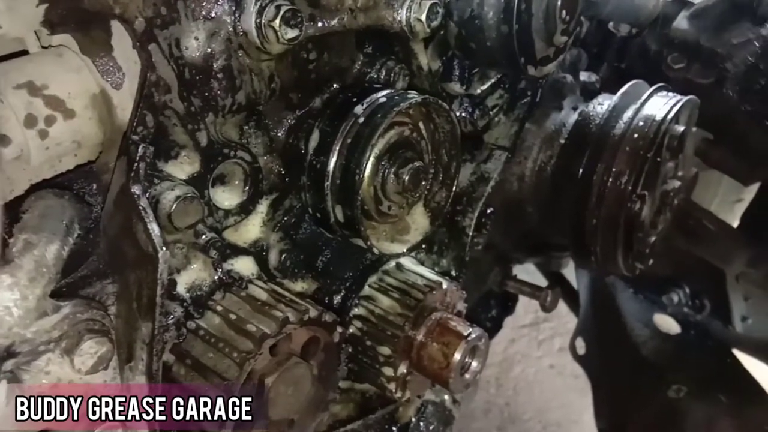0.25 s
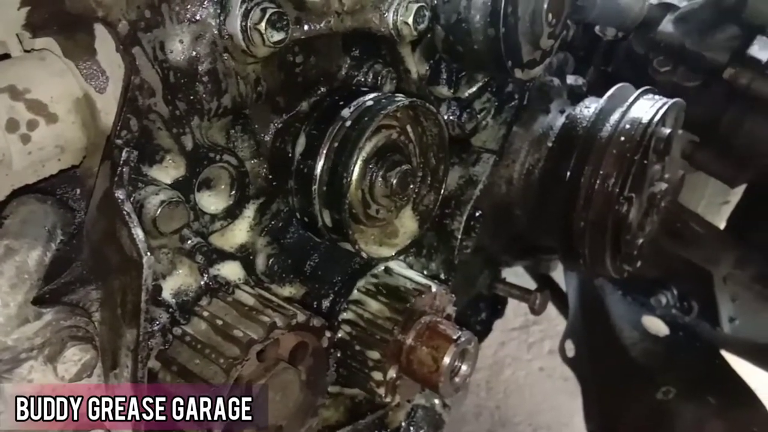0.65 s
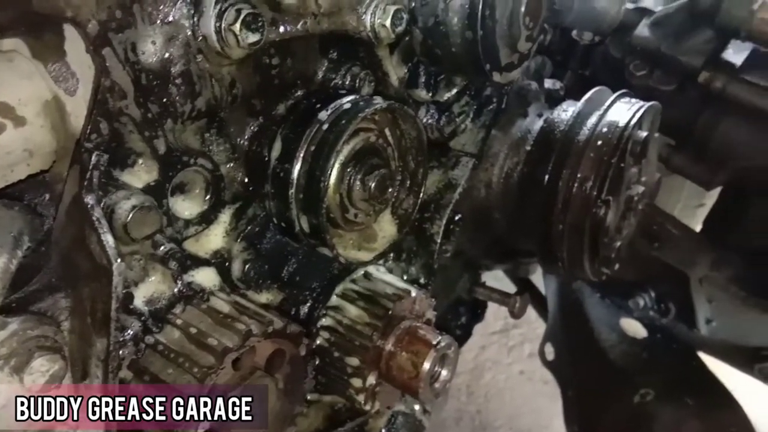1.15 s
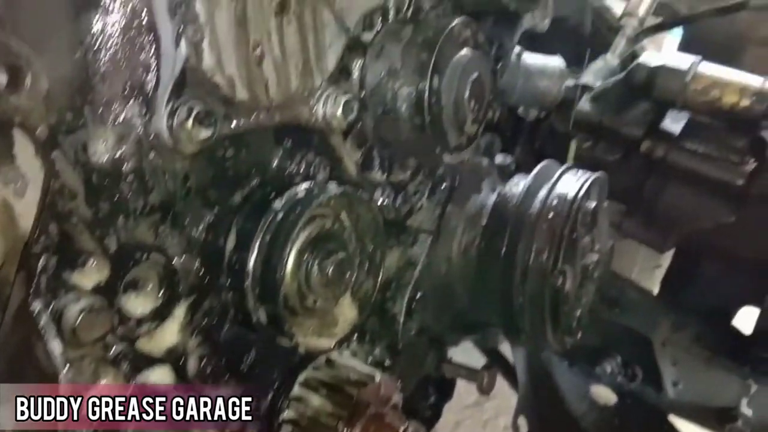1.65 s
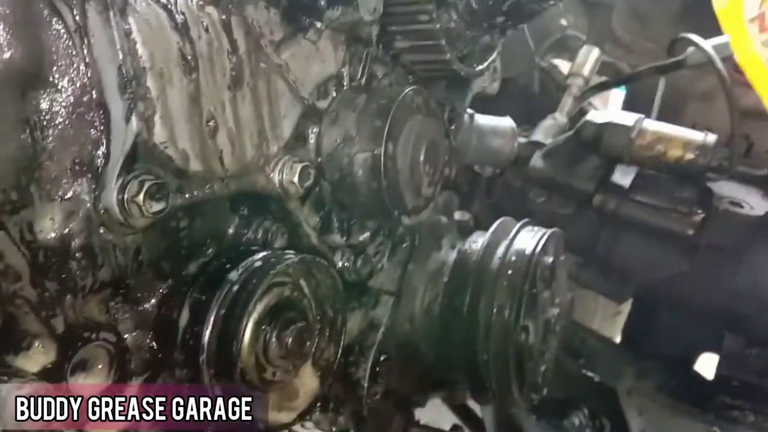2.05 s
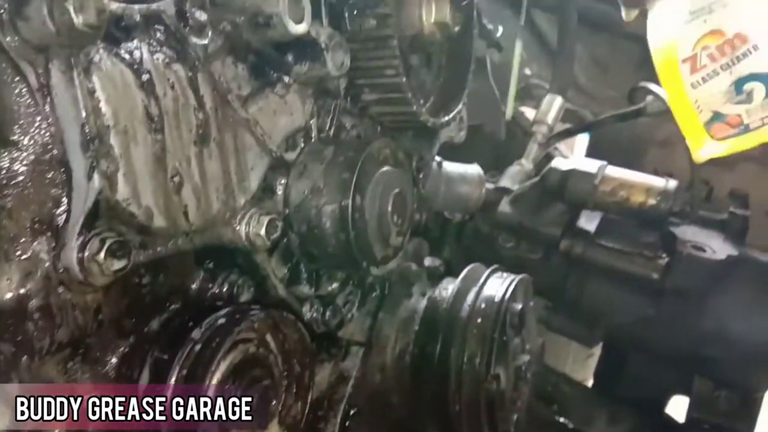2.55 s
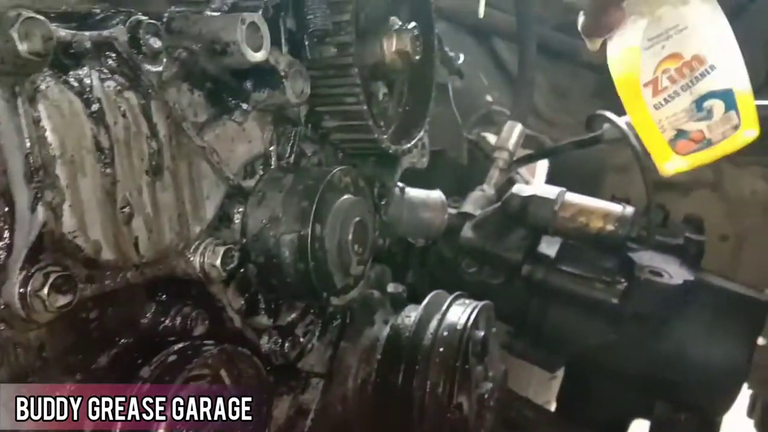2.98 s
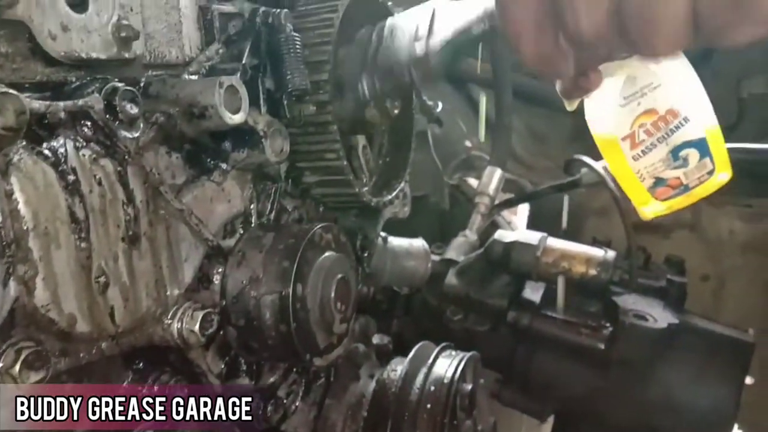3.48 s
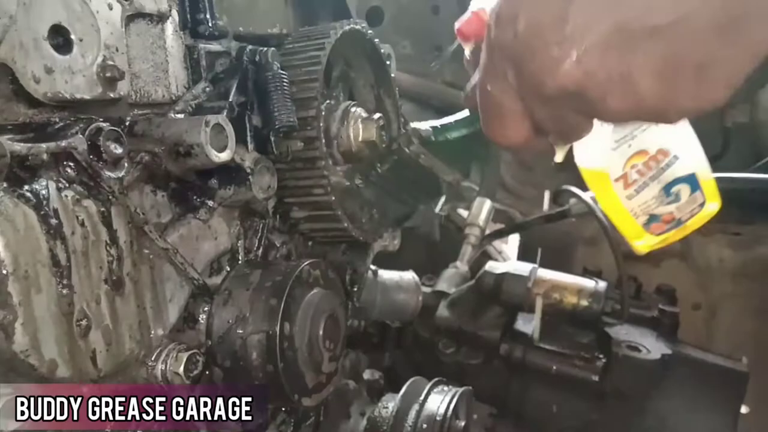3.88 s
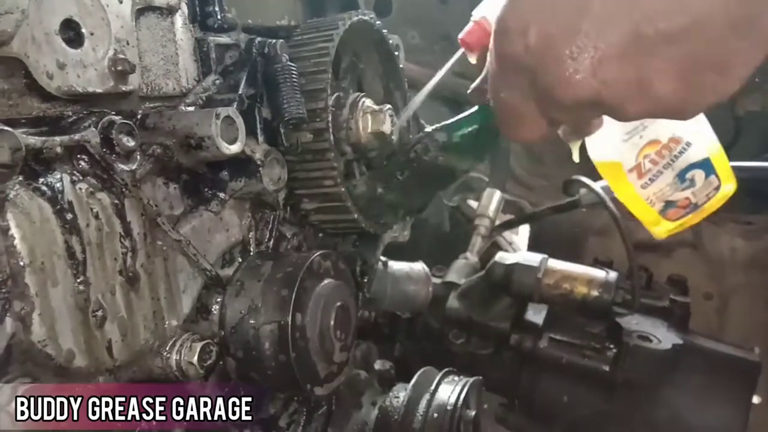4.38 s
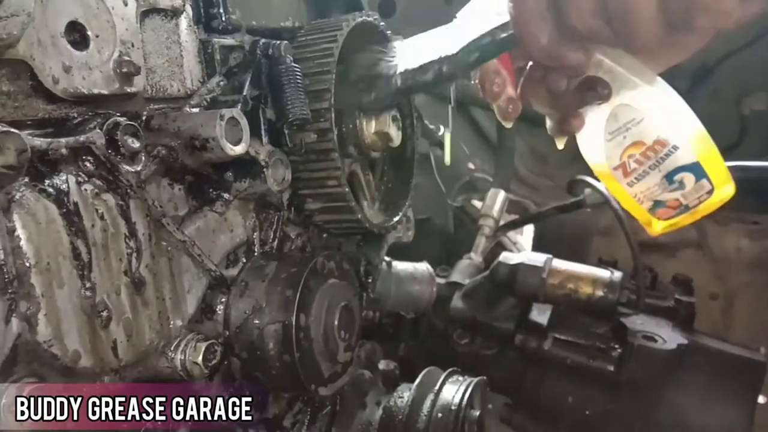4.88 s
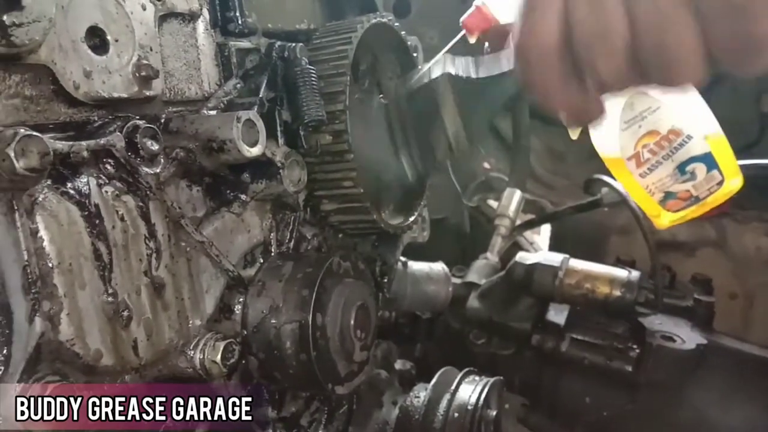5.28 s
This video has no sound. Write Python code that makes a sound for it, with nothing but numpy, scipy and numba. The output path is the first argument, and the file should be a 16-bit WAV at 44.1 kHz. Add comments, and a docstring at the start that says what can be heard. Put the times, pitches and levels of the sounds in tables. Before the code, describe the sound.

Close up in a small garage, a plastic trigger bottle clicks and squirts bright, short jets. The first two drum dully on a hollow cover; later ones splash on wet metal. Scrubbing starts faint, then becomes louder and nearly continuous after about a second, in quick scratchy strokes with little wet spits. A low machine throb wavers behind, and a faint whistle falls once midway. Near-mono phone-like microphone with a short room.

```python
"""In a garage, a trigger bottle squirts cleaner on a greasy engine part that is rubbed in short strokes.
Jets and strokes are flickering grains of noise through resonant bands; each jet bursts out and brightens.
Noise-driven modes give the trigger's snaps, wet spits and the drumming of the first jets on a hollow cover.
Behind, a slow machine throbs as a sum of orders, dull bands of noise swell and a faint whistle falls once."""
import sys
import numpy as np
from scipy import signal
from scipy.fft import rfft, irfft
from scipy.io import wavfile
from scipy.ndimage import uniform_filter1d
from numba import njit

SR = 44100
rng = np.random.default_rng(int(sys.argv[2]) if len(sys.argv) > 2 else 0)


def dump_mix(stems):
    """Bounce the given channels to the path in sys.argv[1] as a 16-bit WAV at rate SR."""
    frames = np.atleast_2d(stems).T  # one column per channel
    limited = np.clip(frames, -1, 1)  # hard clip at full scale
    pcm = np.round(limited * 32767).astype(np.int16)
    wavfile.write(sys.argv[1], SR, pcm)


N = 243873
T = np.arange(N) / SR  # s


def undb(db):
    """Level definition: amplitude ratio of a level in dB."""
    return 10 ** (np.asarray(db) / 20)


def unit(x):
    """Normalisation to an effective (RMS) value of 1."""
    return x / np.sqrt(np.mean(x ** 2))


def peak(x):
    """Normalisation to a peak of 1."""
    return x / np.abs(x).max()


def curves(rows):
    """Linear interpolation of every column after t/s over the scene."""
    s, *columns = np.transpose(rows)
    return [np.interp(T, s, column) for column in columns]


@njit
def svf(x, hz, width):
    """State-variable band-pass with a moving centre, gain 1 at the centre."""
    y, b, l = np.empty(len(x)), 0., 0.
    for i in range(len(x)):
        g, k = np.tan(np.pi * hz[i] / SR), width / hz[i]
        v = (b + g * (x[i] - l)) / (1 + g * (g + k))
        b, l, y[i] = 2 * v - b, l + 2 * g * v, k * v
    return y


def band(x, hz, width_hz):
    """Resonance: band-pass with a fixed or moving centre."""
    return svf(x, np.zeros(N) + hz, 1. * width_hz)


def cut(x, hz, kind, order=4):
    """Butterworth filtering: maximally flat passband."""
    return signal.sosfilt(signal.butter(order, hz, kind, fs=SR, output="sos"), x)


def colour(x, points):
    """Spectral shaping by (f/Hz, level/dB) points, linear in log f."""
    hz = np.fft.rfftfreq(N, 1 / SR) + 1
    f, db = np.array(points).T
    return irfft(rfft(x) * undb(np.interp(np.log(hz), np.log(f), db)), N)


def walk(rate):
    """Smoothed random modulation: values held 1 / rate s, slewed twice; spread near 1."""
    k = max(int(SR / rate), 1)
    steps = np.repeat(rng.standard_normal(N // k + 1), k)
    return 1.12 * uniform_filter1d(uniform_filter1d(steps, k), k)[:N]


def grains(scatter_db, flicker_db, rate):
    """Granular noise: dense one-sample contacts of uneven size under a flickering level."""
    sizes_db = scatter_db * np.minimum(rng.exponential(size=N), 5)
    return rng.standard_normal(N) * undb(sizes_db + flicker_db * walk(rate))


def ring(push, modes):
    """Modal superposition: a push convolved with decaying (f/Hz, level/dB, T60/s) sines."""
    t = np.arange(len(push)) / SR
    body = sum(undb(db) * np.sin(2 * np.pi * hz * t) * np.exp(-np.log(1000) * t / t60)
               for hz, db, t60 in modes)
    return signal.fftconvolve(push, body)[:len(push)]


def add(out, s, x):
    """Linear superposition of an event on the sum from time s."""
    i = int(s * SR)
    out[i:i + len(x)] += x[:N - i]


def jet(s, length):
    """Pressure-driven flow: the level/dB bursts out, builds, sags with the pressure and stops."""
    burst_s, build_s, build_db = 0.0032, 0.037, 4.5
    sag_db_s, stop_db_s = 120, 442
    t = T - s
    db = -build_db * np.clip(1 - t / build_s, 0, 1) - sag_db_s * np.maximum(t - build_s, 0)
    burst_db = 20 * np.log10(np.clip(t / burst_s, 1e-9, 1))
    return db + burst_db - stop_db_s * np.maximum(t - length, 0)


def stroke(s, swell, hold):
    """Speed-dependent friction: level/dB swells as the hand gains speed, holds, dies as it lifts."""
    swell_db, lift_db_s = 14.5, 414
    t = T - s - swell
    return swell_db * np.minimum(t, 0) / swell - lift_db_s * np.maximum(t - hold, 0)


# jets: t/s, mist level/dB, length/s, splash on the casting re mist level/dB, scrape re splash level/dB
JETS = [(0.282, -28, 0.092, -8.5, -8), (0.679, -26, 0.068, -8.5, -4.5), (1.134, -25.5, 0.15, -11, -7),
        (1.757, -28.5, 0.14, -4, -10.5), (2.156, -26, 0.14, -7.5, -13.5), (2.587, -25.5, 0.1, -5.5, -11.5),
        (2.948, -26, 0.083, -8.5, -7), (3.374, -26, .1, -5.5, -8), (3.868, -28, 0.15, -7, -11.5),
        (4.351, -24.5, 0.088, -9, -14), (5.16, -26.5, 0.18, -5, -9)]
# rubbing strokes: t/s, swell/s, hold/s, rub level/dB, scrape re rub level/dB, treble re rub level/dB
RUB_STROKES = [(0.0, 0.0044, 0.28, -63.5, -8.5, 8), (0.055, 0.011, 0.032, -50, -4.5, -14),
               (0.468, 0.11, 0.19, -45, -15.5, 5.5), (0.747, 0.012, .07, -46, -14, 6),
               (0.853, .02, 0.044, -62, -2, 9), (0.909, 0.0061, 0.029, -45, -6.5, -21),
               (1.044, 0.087, 0.038, -45.5, -10.5, 2), (1.196, 0.038, .17, -35, -8, -1.5),
               (1.461, 0.07, 0.095, -36, -11.5, 0), (1.632, 0.031, 0.035, -34.5, -7, 0.5),
               (1.687, 0.022, 0.038, -39, -5.5, -2), (1.915, 0.052, 0.032, -39.5, -7.5, -3),
               (2.063, 0.025, 0.058, -44.5, -10.5, -0.5), (2.343, 0.026, 0.14, -41, -7.5, -1),
               (2.502, 0.022, .06, -52, -14, 5.5), (2.72, 0.013, 0.0089, -47, -24, -4),
               (2.782, 0.0081, 0.024, -50, -5.5, -18), (2.876, 0.024, 0.055, -43.5, -8.5, 0.5),
               (3.031, 0.043, 0.057, -36.5, -8.5, 0), (3.189, 0.026, 0.0047, -34.5, -14, 0.5),
               (3.258, 0.033, 0.075, -37, -9.5, -0.5), (3.454, 0.038, 0.094, -38, -8, -1),
               (3.609, .07, 0.034, -36, -9, -3), (3.76, 0.018, 0.06, -53, -22, -8),
               (3.819, 0.004, 0.024, -47, -13.5, -4), (3.931, 0.02, 0.065, -41, -3.5, -10),
               (4.062, 0.055, .03, -35.5, -11, -3.5), (4.177, 0.027, 0.12, -37.5, -9.5, -3),
               (4.409, 0.058, 0.095, -34, -8, -3), (4.574, 0.013, 0.075, -44.5, -4.5, -7),
               (4.635, 0.056, 0.052, -39, -10.5, -4), (4.824, 0.048, 0.066, -37.5, -13.5, -3.5),
               (4.76, 0.015, 0.077, -58.5, -27, -2), (4.977, 0.055, 0.0085, -36, -19, 0),
               (5.065, 0.03, 0.044, -31.5, -13.5, -5.5), (5.22, 0.015, 0.19, -37.5, -9.5, -5),
               (5.427, 0.028, 0.037, -36, -8, -2.5)]


def handwork():
    """Incoherent addition: jets and strokes sum as power to rub, scrape and mist levels/dB."""
    shapes = [jet(s, length) for s, _, length, *_ in JETS]
    shapes += [stroke(s, swell, hold) for s, swell, hold, *_ in RUB_STROKES]
    layers = [(db + splash, db + splash + scrape, db) for s, db, length, splash, scrape in JETS]
    layers += [(db, db + scrape, db + treble) for s, swell, hold, db, scrape, treble in RUB_STROKES]
    power = undb(layers).T ** 2 @ undb(np.maximum(shapes, -150)) ** 2
    return 10 * np.log10(power)


# spectrum of the droplet hiss: f/Hz, relative density level/dB per Hz
MIST_SPECTRUM = [(4410, -32), (7500, -2), (8040, -9), (8920, -1), (9620, 3), (12700, 1.5), (14900, 10),
                 (15500, 4)]


def mist(mist_db):
    """Droplet noise: a treble hiss, with a bright band that climbs as the pump pressure builds."""
    starts = [row[0] for row in JETS]
    since = T - np.array([-1] + starts)[np.searchsorted(starts, T)]  # s since the latest jet began
    drops = grains(scatter_db=1.6, flicker_db=2.3, rate=80)
    hiss = unit(colour(drops, MIST_SPECTRUM))
    dull = signal.sosfiltfilt(signal.butter(4, 11600, fs=SR, output="sos"), hiss)
    # a stronger jet breaks into finer drops: more of the very top, some ms after it starts
    top_gain = undb(np.minimum(0.5 * (mist_db + 11), 2.5))
    top = (hiss - dull) * top_gain * (1 - np.exp(-since / 0.0015))
    climb_hz = 14500 - 8500 * np.exp(-since / 0.027)
    climb = band(drops, climb_hz, 1100) * np.exp(-since / 0.039)
    return undb(mist_db) * (dull * undb(0.34 * walk(31.76)) + top + undb(4.5) * climb / np.std(drops))


# broad resonances of the wet casting: f/Hz, width/Hz, level/dB
CASTING_BANDS = [(4810, 240, -10), (5398, 500, 0.5), (6564, 690, -0.5), (7104, 260, -4), (9980, 1400, -6),
                 (10500, 410, 7)]
# resonances stirred by the scrape: f/Hz, width/Hz, level/dB
SCRAPE_BANDS = [(1710, 380, -7.5), (1940, 140, -7), (2213, 260, 0), (2640, 520, -3), (3052, 210, 7),
                (3516, 220, 0), (3890, 470, 3)]


def rubbing(rub_db, scrape_db):
    """Friction excitation: slipping wet bristles stir drifting, flickering resonances of the casting."""
    slips = grains(scatter_db=2.1, flicker_db=2.0, rate=90)
    hiss = sum(undb(db + 3.05 * walk(30)) * band(slips, hz * (1 + 0.016 * walk(10)), width)
               for hz, width, db in CASTING_BANDS)
    hiss = unit(hiss) + undb(-9.5) * unit(band(slips, 7800, 2500))
    hiss = cut(hiss, [4500, 9000], "band", order=5)
    drag = grains(scatter_db=3.0, flicker_db=2.4, rate=110)
    scrape = sum(undb(db + 3.5 * walk(40) + 2 * walk(8)) * band(drag, hz * (1 + .045 * walk(10)), width)
                 for hz, width, db in SCRAPE_BANDS)
    scrape = cut(scrape, [1450, 4600], "band", order=3)
    return undb(rub_db) * (unit(hiss) + undb(scrape_db) * unit(scrape))


# snaps and ticks: t/s, tick peak level/dB, tick f/Hz, head clack re tick level/dB, crack re tick level/dB
TRIGGER_SNAPS = [(0.056, -35, 6600, -40, -25), (0.065, -19, 5480, -60, -19), (0.067, -40, 2880, -30, -15),
                 (0.091, -41, 8400, -30, -17), (0.1123, -42, 6040, -8, 4), (0.145, -41.5, 7350, -16, -24),
                 (0.2104, -41, 6750, -28, -26), (0.2409, -44, 9000, -30, -11),
                 (0.2677, -37, 7300, -23, -19), (0.2858, -32, 7200, 0, 10), (0.468, -37, 6960, -18, 5),
                 (0.4744, -17, 6800, 4.5, 6.5), (0.636, -35, 7000, -21, -22),
                 (0.684, -21.5, 8600, -29, 1.5), (0.845, -33, 6930, -25, -16),
                 (0.9155, -33.5, 2360, -35, 0), (0.9182, -25.5, 5560, -48, -11),
                 (1.032, -40.5, 7640, -24, -8), (1.082, -36, 6740, -34, -12),
                 (1.1387, -25.5, 6020, -29, -0.5), (1.3611, -25.5, 1820, 11, 6.5),
                 (1.447, -31, 2640, -3, -6), (1.454, -19, 6560, 3.5, 8), (1.657, -25.5, 6660, -6.5, -12),
                 (2.081, -38, 6470, -11, -20), (2.1606, -21.5, 5400, -47, -17),
                 (2.3074, -42, 1890, -24, -15), (2.3859, -30, 5560, -36, -6), (2.59, -22.5, 5400, -44, -12),
                 (2.787, -30.5, 6140, -42, -9), (2.9532, -25.5, 5070, -13, -2), (3.1406, -36, 6000, -8, -6),
                 (3.3748, -24.5, 5600, -15.5, -10), (3.583, -38, 5900, -21, 1.5),
                 (3.599, -38, 8500, -30, -6), (3.8234, -46, 5440, -19, 2), (4.065, -32, 6200, -34, -1),
                 (4.1194, -27.5, 7260, -17, -8), (4.347, -31, 5470, -30, 0), (5.164, -24.5, 5600, -37, 2)]
# modes of the trigger head: f/Hz, level/dB, T60/s
HEAD_MODES = [(835, -4, .045), (1050, -6, .03), (1360, -6, .025), (1550, -5, .03), (1800, 0, .035),
              (1930, -2, .03), (2300, -4, .02), (2700, -5, .02), (3160, -5, .02), (3720, -7, .015)]


def snaps():
    """Impact excitation: the plastic trigger rattles on its stop with a tick, a crack and a dry clack."""
    out, t = np.zeros(N), np.arange(int(.15 * SR)) / SR
    fall = np.log(1000) * t / 0.061  # T60/s of the rattle
    noises = rng.standard_normal((len(TRIGGER_SNAPS), len(t)))
    for (s, db, hz, clack_db, crack_db), noise in zip(TRIGGER_SNAPS, noises):
        rattle = noise * np.minimum(t / 0.0006, 1)
        tick = cut(ring(rattle * np.exp(-1.5 * fall), [(hz, 0, .01)]), hz / 2, "high", order=2)
        # the first contact is the hardest
        crack = rattle * (np.exp(-fall) + 2.5 * np.exp(-t / .0025))
        crack = cut(crack, [1800, 10000], "band", order=4)
        shake = rattle * (np.exp(-fall) + .4 * np.exp(-.35 * fall) + 3.0 * np.exp(-t / .0012))
        clack = peak(cut(ring(shake, HEAD_MODES), 650, "high"))
        clack = clack + .9 * peak(cut(shake, [900, 5200], "band", order=3))
        snap = peak(tick) + undb(crack_db) * peak(crack) + undb(clack_db) * peak(clack)
        add(out, s, undb(db) * snap)
    return out


# wet spits where a bristle or a drop strikes the casting: t/s, peak level/dB, ring f/Hz
WET_SPITS = [(1.6601, -32, 4400), (1.763, -29, 3980), (1.949, -41, 4080), (2.1211, -45, 4400),
             (2.3635, -46, 4380), (2.3868, -35, 3070), (2.617, -35, 3000), (2.6663, -26, 4500),
             (2.7873, -45, 3200), (2.8094, -42, 2950), (2.882, -54, 3120), (3.0622, -40, 3120),
             (3.1396, -35, 2270), (3.2191, -41, 3540), (3.3772, -34.5, 3080), (3.4095, -29, 3020),
             (3.6462, -37, 3020), (3.8746, -46, 4000), (4.1732, -35.5, 2840), (4.2278, -46, 3120),
             (4.2864, -33, 3060), (4.3476, -35.5, 3140), (4.7002, -40, 3100), (4.861, -39.5, 3130),
             (5.0882, -45, 3100), (5.2949, -33, 4060)]


def spits():
    """Impulse response: each short wet push rings one spot of the casting."""
    out, t = np.zeros(N), np.arange(int(.05 * SR)) / SR
    noises = rng.standard_normal((len(WET_SPITS), len(t)))
    for (s, db, hz), noise in zip(WET_SPITS, noises):
        push = noise * np.exp(-t / 0.003)
        spot = cut(ring(push, [(hz, 0, 0.015)]), hz / 2, "high", order=2)
        splat = cut(push, [1800, 8000], "band", order=2)
        add(out, s, undb(db) * peak(peak(spot) + 0.62 * peak(splat)))
    return out


# slugs of liquid on the cover: t/s, boom peak level/dB, drumming length/s, clatter re boom level/dB
SLUGS = [(0.0, -40.5, 0.0059, -20), (0.303, -16, 0.009, -12), (0.322, -21, 0.006, -10),
         (0.351, -30, 0.006, -14), (0.381, -37, 0.005, -20), (0.692, -16, 0.01, -13),
         (0.708, -16, 0.01, -9), (0.745, -29, 0.012, -16), (0.795, -34, 0.012, -20),
         (0.847, -38, 0.01, -25)]
# modes of the hollow cover: f/Hz, level/dB, T60/s
COVER_MODES = [(242, 0, .11), (305, -5, .07), (330, -5, .07), (395, -7, .06), (465, -9, .05),
               (565, -7, .06), (716, -11, .045), (945, -10, .045), (1255, -12, .035), (1910, -7, .04),
               (2250, -9, .03), (2690, -8, .03), (3200, -10, .025), (3700, -12, .02)]


def drums():
    """Modal excitation: each slug beats on the hollow cover with a rough clatter, then dribbles softly."""
    out, t = np.zeros(N), np.arange(int(.4 * SR)) / SR
    noises = rng.standard_normal((len(SLUGS), len(t)))
    for (s, db, length, clatter_db), noise in zip(SLUGS, noises):
        beat = noise * np.minimum(t / 0.002, 1) * np.exp(-np.maximum(t - length, 0) / 0.0078)
        # the dribble is soft and uneven, so it stirs mainly the low modes
        dribble = noise[::-1] * (t > length) * np.exp(-(t - length) / 0.028)
        dribble = cut(dribble, 700, "low", order=2)
        boom = cut(ring(beat + 0.5 * dribble, COVER_MODES), 210, "high")
        thud = cut(beat + dribble, [300, 1400], "band", order=2)
        clatter = cut(beat, [1700, 4500], "band", order=2)
        drum = peak(boom) + undb(-12) * peak(thud) + undb(clatter_db) * peak(clatter)
        add(out, s, undb(db) * drum)
    return out


# the two strong orders swell and fade in turn: t/s, order 5 level/dB, order 6 level/dB
STRONG_ORDERS = [(0.0, -46, -43), (0.04, -38.5, -43.5), (0.66, -40.5, -38), (1.09, -46, -36.5),
                 (1.2, -42.5, -37.5), (1.74, -49.5, -47), (1.86, -44.5, -47), (2.14, -36, -49.5),
                 (2.25, -37.5, -59), (2.28, -39.5, -53), (2.51, -38.5, -44.5), (2.77, -47, -41),
                 (2.86, -49, -44), (3.13, -53.5, -37), (3.62, -40, -43), (3.77, -40.5, -40.5),
                 (4.21, -54.5, -55), (4.26, -49, -47), (4.33, -65, -56), (4.36, -49.5, -46),
                 (4.56, -56, -40.5), (4.82, -48, -48), (4.85, -65, -68), (4.91, -66, -43), (4.97, -56, -58),
                 (5.08, -55, -41.5), (5.16, -97, -86), (5.39, -55, -41.5), (5.44, -53, -59),
                 (5.53, -65, -70)]
# other orders: order, relative level/dB, share that follows order 5 rather than 6
WEAK_ORDERS = [(3, -31, .9), (4, -12, .9), (7, -8.5, .3), (8, -11, .4), (9, -17, .4)]


def machine():
    """Fourier synthesis: low orders of a piston stroke, wavering separately in level and phase."""
    stroke_hz = 21.83
    five_db, six_db = curves(STRONG_ORDERS)
    orders = [(5, five_db), (6, six_db)]
    for order, db, share in WEAK_ORDERS:
        orders.append((order, db + share * five_db + (1 - share) * six_db + 3 * walk(2.72)))
    out = np.zeros(N)
    for order, db in orders:
        swell_db = 2.2 * walk(9)
        phase = .4 * walk(6) + 2 * np.pi * rng.random()
        out += np.sqrt(2) * undb(db + swell_db) * np.sin(2 * np.pi * order * stroke_hz * T + phase)
    return out


# level of the two lower dull bands: t/s, level/dB
DULL_SWELL = [(0.0, -72), (1.05, -71), (1.22, -56), (1.36, -58), (1.5, -53), (1.69, -56.5), (1.84, -67),
              (1.92, -73), (2.18, -64.5), (2.34, -72), (2.45, -59), (2.52, -66), (3.1, -65.5), (3.22, -61),
              (3.45, -61.5), (3.78, -68.5), (3.93, -56), (4.0, -50.5), (4.08, -69), (4.3, -61.5),
              (4.5, -61), (4.66, -56.5), (4.8, -70), (5.17, -57.5), (5.53, -63)]
# level of the wandering band near 1.2 kHz: t/s, level/dB
UPPER_SWELL = [(0.0, -76), (0.6, -66), (1.05, -72), (1.2, -66), (1.38, -58), (1.54, -57.5), (1.66, -56),
               (1.83, -68), (2.2, -71.5), (3.39, -61), (3.54, -60), (3.73, -67), (3.94, -58), (4.08, -63),
               (4.4, -62), (4.61, -59.5), (5.01, -61), (5.53, -54)]


def wander(hz, width_hz):
    """Narrow-band noise with a wandering centre and a flickering level."""
    moving = band(rng.standard_normal(N), hz * (1 + 0.086 * walk(4.97)), width_hz)
    return unit(band(moving, hz, 2 * width_hz)) * undb(2. * walk(21.48))


def far_noise():
    """Amplitude-modulated noise: three wandering bands of the middle range swell further off."""
    lower_db = curves(DULL_SWELL)[0] + 2.5 * walk(16)
    upper_db = curves(UPPER_SWELL)[0] + 3.4 * walk(14)
    lower = 0.49 * wander(596, 123) + 0.47 * wander(893, 70)
    return undb(lower_db) * lower + undb(upper_db) * wander(1182, 118)


# the falling whistle: t/s, f/Hz, level/dB
FALLING_TONE = [(2.59, 722, -74), (2.61, 717, -48.5), (2.69, 690, -48), (2.71, 685, -49),
                (2.73, 671.5, -52.5), (2.81, 659, -54), (2.835, 640.4, -64), (2.87, 605, -57),
                (2.93, 601, -55), (2.955, 590, -63), (2.985, 600, -53), (3.005, 602, -70),
                (3.035, 593, -59), (3.08, 583, -69)]
# a thin tone near 870 Hz comes and goes: t/s, level/dB
THIN_TONE = [(2.66, -76), (2.716, -49), (2.76, -69), (2.82, -74), (2.85, -63), (2.92, -57), (2.95, -74),
             (2.98, -51), (3.01, -75), (3.3, -74), (3.54, -59.5), (3.7, -76)]


def whistle():
    """Frequency modulation: a thin, rough tone slides down, blurred by breathy narrow-band noise, under a
    steadier one."""
    hz, db = curves(FALLING_TONE)
    start, end = FALLING_TONE[0][0], FALLING_TONE[-1][0]
    gate = np.clip((T - start) / 0.013, 0, 1) * np.clip((end - T) / .03, 0, 1)
    clear = np.sqrt(2) * np.sin(2 * np.pi * np.cumsum(hz * (1 + .016 * walk(45))) / SR)
    breathy = unit(band(band(rng.standard_normal(N), hz, 60), hz, 60))
    slide = gate * undb(db + 1.8 * walk(40)) * (.45 * clear + .7 * breathy)
    span = (T > THIN_TONE[0][0]) & (T < THIN_TONE[-1][0])
    thin = unit(band(band(rng.standard_normal(N), 871, 30), 860, 30))
    return slide + uniform_filter1d(1. * span, size=2000) * undb(curves(THIN_TONE)[0]) * thin


# spectrum of the garage background: f/Hz, relative density level/dB per Hz
GARAGE_SPECTRUM = [(15, -63), (25, -12), (50, -5), (125, 13), (160, 9), (250, -10), (404, -24), (1030, -45),
                   (1300, -34), (1600, -38), (2430, -38), (3010, -60), (4260, -70), (5280, -20),
                   (6900, -12), (10000, -28), (15000, -46)]


def garage():
    """Third-octave noise: rumble and distant noise whose bands flicker alone; the deepest slowly fade."""
    air = unit(colour(rng.standard_normal(N), GARAGE_SPECTRUM))
    noise = np.zeros(N)
    for hz in 30 * 2 ** np.arange(0, 9, 1 / 3):
        fade_db = 3.5 * (T - T.mean()) * (hz < 100)  # 3.5 dB/s
        noise += undb(3. * walk(9) - fade_db) * band(air, hz, hz / 4)
    return undb(-49.5) * unit(noise)


def room(near):
    """Reverberation: convolution with an exponentially decaying noise tail that starts after 4 ms."""
    t = np.arange(int(.4 * SR)) / SR
    t60_s, room_db = 0.1, -13
    tail = rng.standard_normal(len(t)) * np.exp(-np.log(1000) * t / t60_s) * (t > .004)
    return undb(room_db) * signal.fftconvolve(near, tail / np.linalg.norm(tail))[:N]


def scene():
    """Superposition: near sources with their room, then the background, nearly equal in both channels."""
    rub_db, scrape_db, mist_db = handwork()
    near = mist(mist_db) + rubbing(rub_db, scrape_db - rub_db) + snaps() + spits() + drums()
    mid = near + room(near) + machine() + far_noise() + whistle() + garage()
    # one microphone; only a faint hiss differs between the channels
    side = undb(-84.5) * unit(band(rng.standard_normal(N), 2000, 19000))
    return np.array([mid + side, mid - side])


def record(dry):
    """Band limitation: the phone cuts the top above 15550 Hz (elliptic low-pass)."""
    return signal.sosfilt(signal.ellip(8, .2, 70, 15550, fs=SR, output="sos"), dry)


dry = scene()
out = record(dry)
dump_mix(out)
```